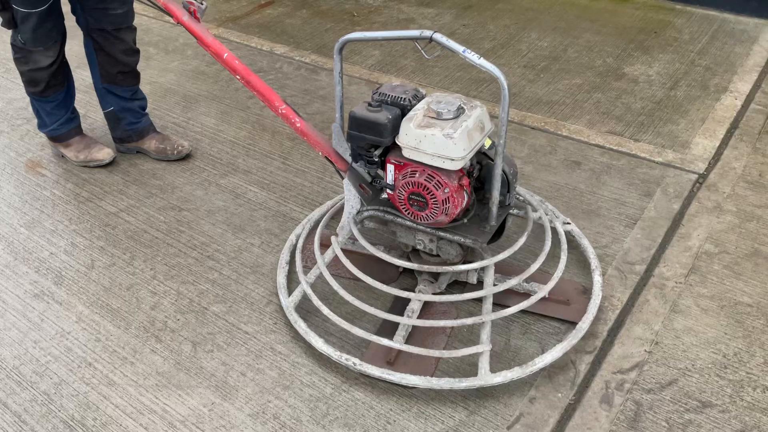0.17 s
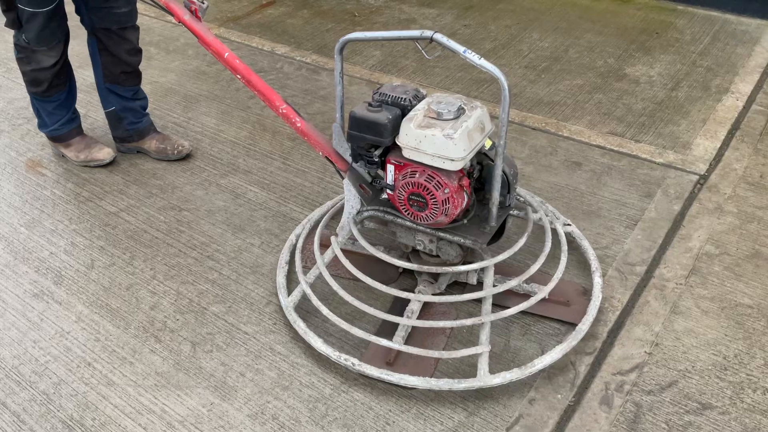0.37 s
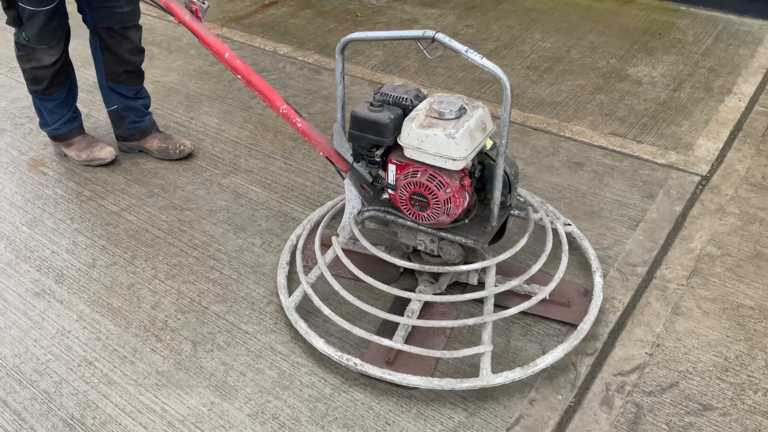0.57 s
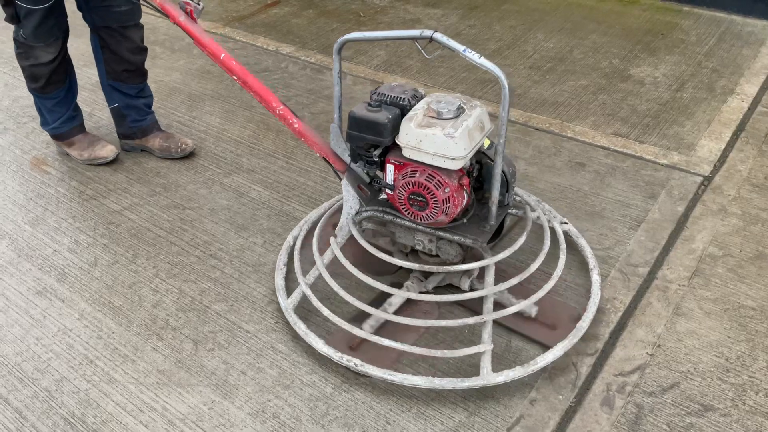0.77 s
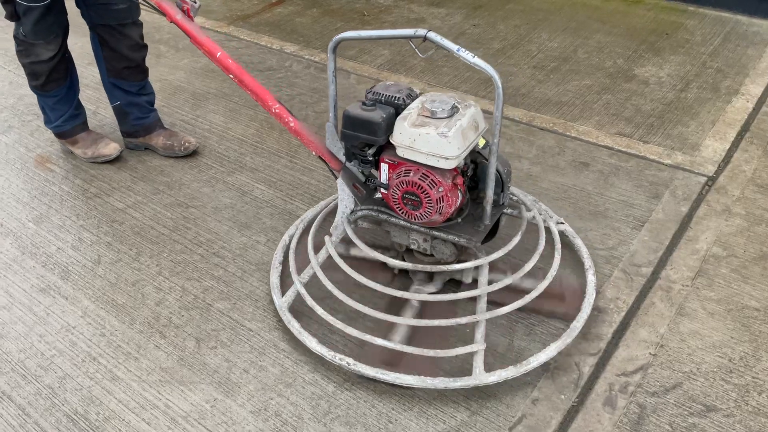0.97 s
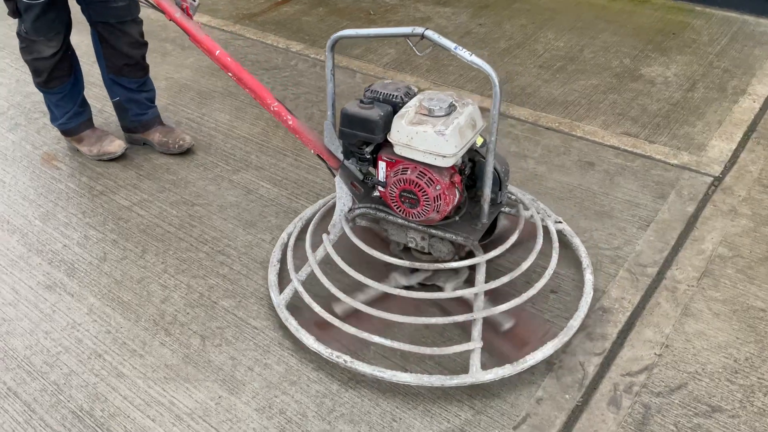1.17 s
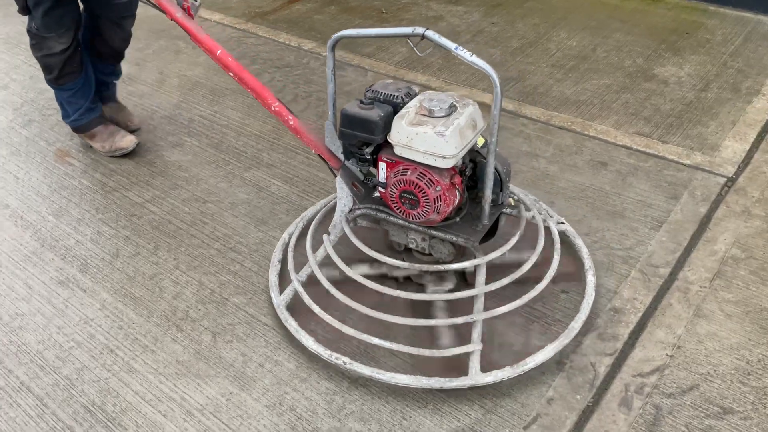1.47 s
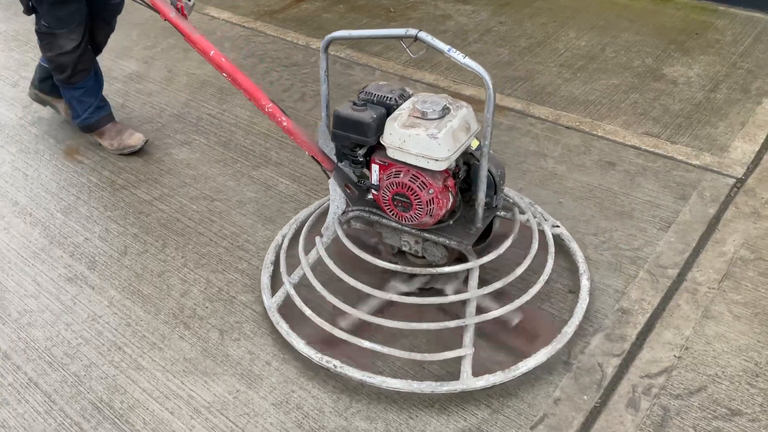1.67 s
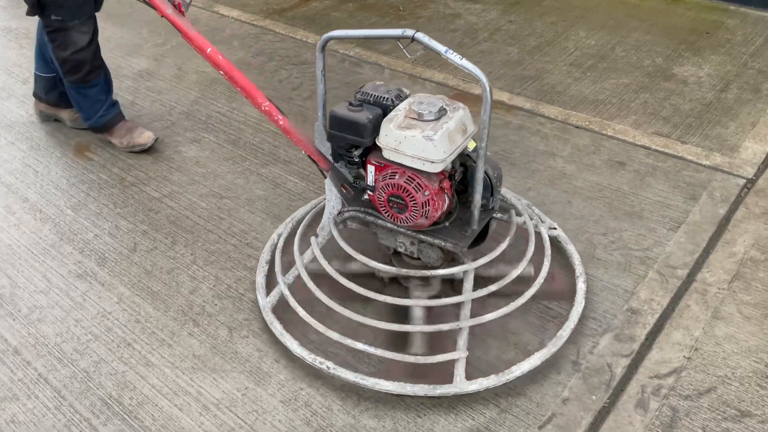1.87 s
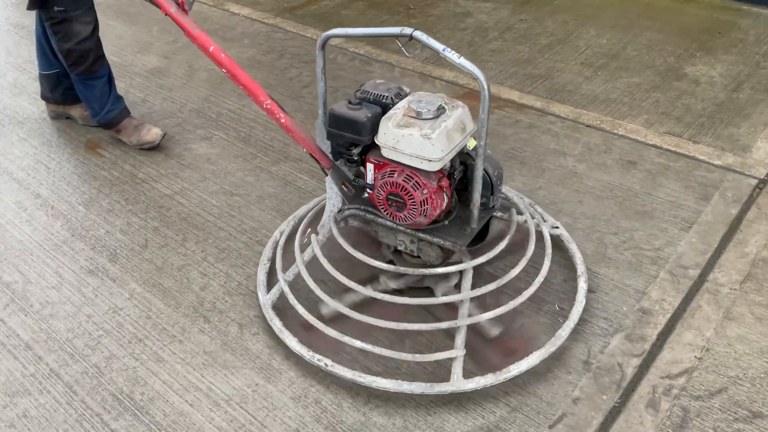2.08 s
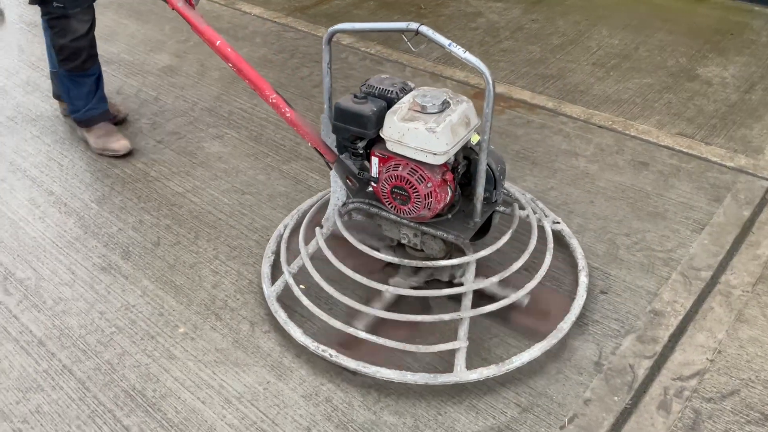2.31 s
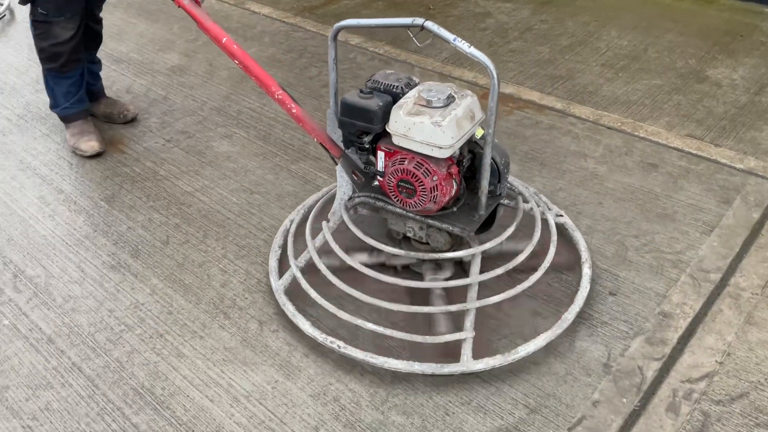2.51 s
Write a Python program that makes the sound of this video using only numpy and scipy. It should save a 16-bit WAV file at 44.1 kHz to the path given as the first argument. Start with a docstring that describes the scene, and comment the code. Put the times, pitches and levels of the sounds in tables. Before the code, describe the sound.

A small petrol engine chugs, squeaks as the drive engages, then gritty blade scraping covers it

```python
"""Petrol power trowel on concrete

A single-cylinder engine close by drones as a sum of harmonics of its firing rate, with filtered-noise clatter
and intake hiss. It sags as the drive takes up with noise-burst ticks and swept-sine squeaks; then the steel
blades turn, their gritty scrape (resonant noise with random grains) covers the engine, and the speed recovers."""
import sys
import numpy as np
from scipy import signal
from scipy.fft import rfft, irfft
from scipy.io import wavfile
from scipy.ndimage import uniform_filter1d

SR = 44100
rng = np.random.default_rng(int(sys.argv[2]) if len(sys.argv) > 2 else 0)


def store_wav(level_fs):
    """Save 16-bit WAV to argv[1]."""
    pcm = np.round(np.clip(np.atleast_2d(level_fs), -1, 1) * 32767)
    wavfile.write(sys.argv[1], SR, pcm.T.astype(np.int16))


N = 116865
T, HZ = np.arange(N) / SR, np.fft.rfftfreq(N, 1 / SR)

# engine speed: t/s, firing rate/Hz
ENGINE_SPEED = [(.04, 30.71), (.12, 30.78), (.2, 30.85), (.28, 30.3), (.36, 29.37), (.44, 28.26),
                (.52, 27.69), (.62, 28.36), (.72, 27.03), (.88, 26.2), (1.05, 25.97), (1.2, 28.43),
                (1.35, 29.9), (1.5, 29.22), (1.72, 28.49), (1.93, 29.56), (2.08, 29.35), (2.21, 27.53),
                (2.45, 30.05), (2.65, 28.98)]
# engine loudness: t/s, exhaust level/dB, clatter level/dB
ENGINE_LEVEL = [(.04, -19.5, -15), (.19, -19.5, -17), (.35, -21, -17.5), (.44, -17, -18), (.52, -13.5, -20),
                (.615, -11.5, -18), (.645, -21, -29.5), (.78, -22.5, -20.5), (.83, -26.5, -30),
                (1.07, -33, -32), (1.22, -31.5, -35), (1.38, -37, -28), (1.52, -37.5, -41), (1.9, -40, -49),
                (2.3, -40.5, -46.5), (2.65, -45.5, -41)]
# colour of the scrape, also used for the intake hiss: f/Hz, spectral density/dB per Hz
GRIT_COLOUR = [(30, -25), (150, -19), (400, -15.5), (520, -9), (780, -3), (1050, -6), (1400, -4.5),
               (1900, -4.5), (2300, -3), (3600, -4.5), (6000, -4.5), (7200, -8.5), (8500, -10.5),
               (10000, -15), (12000, -21), (16000, -27.5)]


def amp(db):
    """Decibels to gain: twenty decibels per decade of amplitude."""
    return 10 ** (np.asarray(db) / 20)


def unit(x):
    """Normalisation to an rms value of 1."""
    return x / np.sqrt(np.mean(x ** 2) + 1e-20)


def curve(table, axis=1):
    """Linear interpolation in time of one column of a table, at every sample."""
    rows = np.transpose(table)
    return np.interp(T, rows[0], rows[axis])


def read(table):
    """Interpolation of a frequency table on a logarithmic axis."""
    f, value = np.transpose(table)
    return np.interp(np.log(HZ + 1), np.log(f + 1), value)


def rings(modes):
    """Resonance: each mode (f/Hz, width/Hz, height/dB) is a bell-shaped bump in decibels."""
    return sum(db / (1 + (2 * (HZ - f) / width) ** 2) for f, width, db in modes)


def drift(hz):
    """Low-pass noise: a random wander up to the given rate, rms 1."""
    spectrum = rfft(rng.standard_normal(N))
    return unit(irfft(spectrum / (1 + (HZ / hz) ** 4), N))


def body(x, db):
    """Minimum-phase filtering: a causal ring of unit power whose spectrum has the given shape in dB."""
    cepstrum = irfft(np.log(amp(db)), N)
    # folding the cepstrum onto positive time makes the response causal
    cepstrum[1:N // 2] *= 2
    cepstrum[N // 2:] = 0
    ring = irfft(np.exp(rfft(cepstrum)), N)[:4096]
    return signal.fftconvolve(x, ring / np.linalg.norm(ring))[:N]


def add(mix, s, sound):
    """Superposition: mixes a sound in at time s, in seconds."""
    part = mix[round(s * SR):][:len(sound)]
    part += sound[:len(part)]


def exhaust(cycles):
    """Fourier synthesis: periodic gas puffs make multiples of the firing rate, recoloured by load."""
    # exhaust note: multiple of the firing rate, level running free/dB, level under load/dB
    orders = [(1, -26, -33), (2, -4, -3), (3, -7, -3.5), (4, -6, -21), (5, 4.5, 2), (6, -3, -7),
              (7, -5, -6), (8, -9, -18), (9, -1.5, -10.5), (10, -1, -10.5), (11, -24, -6.5), (12, -13, -10),
              (13, -9, -8), (14, -3, -13.5), (15, -13, -16.5), (16, -32, -12), (17, -13, -14.5),
              (18, -12, -13), (19, -16, -8), (20, -22, -11)]
    # swings of gas pressure: place in the cycle (0-1), signed strength
    puffs = [(.14, -0.47), (0.221, 0.88), (0.356, -0.52), (0.648, 0.66), (0.751, -0.16), (0.842, 0.71),
             (0.943, -0.35)]
    # strain on the engine, easing briefly as the blades get going: t/s, load (0-1)
    strain = [(.36, 0), (.48, 0.92), (.9, 0.94), (1.2, 0.12), (1.45, 1)]
    # weight of the lowest multiples, which thin out when the engine fires weakly: t/s, level/dB
    thump = [(.07, 4), (.16, 9), (.225, -16), (.27, 4), (.35, 0), (.45, -8), (.51, 0), (.85, 0.5), (1.0, 2),
             (1.08, 3), (1.16, 4), (1.5, 2)]
    thump_orders = 4
    waver_db, waver_hz, phase_scatter_rad = 0.9, 16.0, 0.25
    puff_jitter_cycles, puff_jitter_hz = .003, 60  # unevenness of the gas flow
    stroke_db = 0.9  # spread in strength from one firing to the next

    load = curve(strain)
    turns = cycles + puff_jitter_cycles * drift(puff_jitter_hz)
    note = np.zeros(N)
    for k, (_, free, loaded) in enumerate(orders, 1):
        # phase of this multiple in a train of impulses at the puff places
        timing = np.angle(sum(size * np.exp(-2j * np.pi * k * place) for place, size in puffs))
        level_db = free + (loaded - free) * load + waver_db * drift(waver_hz)
        if k <= thump_orders:
            level_db = level_db + curve(thump)
        phase = timing + phase_scatter_rad * rng.standard_normal()
        note += amp(level_db) * np.cos(2 * np.pi * k * turns + phase)

    firings = np.arange(int(cycles[-1]) + 2)
    uneven = np.interp(cycles, firings, rng.standard_normal(len(firings)))
    return unit(note) * amp(curve(ENGINE_LEVEL) + stroke_db * uneven)


def knock_gate(cycles):
    """Periodic modulation: piston and valve knocks decay exponentially over a steady bed."""
    # knocks: place in the cycle (0-1), strength
    knocks = [(0.138, 0.4), (.36, 0.29), (0.602, 0.46), (0.808, 1.0)]
    bed, knock_length_cycles = .7, .09
    gate = np.full(N, bed)
    for place, size in knocks:
        gate += size * np.exp(-((cycles - place) % 1) / knock_length_cycles)
    return gate


def clatter(cycles):
    """Impact excitation: knocks ring the crankcase, partly alike from cycle to cycle."""
    # engine clatter: f/Hz, spectral density/dB per Hz
    colour = [(20, -40), (40, -8), (65, 0), (170, -7.5), (220, -22.5), (400, -6), (680, -0.5),
              (1000, -11.5), (1200, -1.5), (1400, -8.5), (1800, -11), (2500, -13.5), (4000, -21.5),
              (6200, -24.5), (9000, -30.5), (12000, -38), (16000, -49)]
    # crankcase modes: f/Hz, width/Hz, level over the clatter/dB
    crankcase = [(720, 67, -2.5), (905, 37, 6.5), (1200, 74, -6.5), (1424, 34, 2.5), (2030, 55, 0),
                 (3190, 85, 5)]
    repeat_share = .45  # share of power that repeats each cycle

    # one cycle of noise, replayed in step with the engine
    count = round(SR / ENGINE_SPEED[0][1])
    pattern = rng.standard_normal(count)[(cycles % 1 * count).astype(int)]
    highpass = signal.butter(2, 450, "high", fs=SR, output="sos")
    alike = unit(signal.sosfilt(highpass, pattern))
    fresh = rng.standard_normal(N)
    noise = np.sqrt(repeat_share) * alike + np.sqrt(1 - repeat_share) * fresh
    ringing = body(knock_gate(cycles) * noise, read(colour) + rings(crankcase))
    return unit(ringing) * amp(curve(ENGINE_LEVEL, axis=2))


def intake_hiss(cycles):
    """Flow noise: broadband hiss with a tinny resonance, modulated in step with the knocks."""
    # intake hiss before the load comes on: t/s, level/dB
    hiss_level = [(.04, -28.5), (.18, -28), (.22, -25), (.305, -25.5), (.335, -46), (.6, -56), (.8, -75)]
    # tinny ring in the hiss: f/Hz, width/Hz, height/dB
    cover = [(3380, 48, 16), (4230, 120, 10.5)]
    noise = knock_gate(cycles) * rng.standard_normal(N)
    return unit(body(noise, read(GRIT_COLOUR) + rings(cover))) * amp(curve(hiss_level))


def scrape():
    """Friction noise: grit breaks under juddering blades and rings them; colour shifts with the contact."""
    # blades on concrete: t/s, level/dB, extra treble/dB
    contact = [(.6, -44, -17.5), (.66, -25.5, 6), (.715, -19, -2), (.755, -12, -3.5), (.82, -12, -2.5),
               (.94, -12, -2), (1.05, -13.5, 1.5), (1.11, -13.5, 0.5), (1.18, -13, 0.5), (1.27, -14, 0.5),
               (1.39, -14, 2.5), (1.55, -17.5, 2), (1.7, -18.5, 1), (1.82, -17.5, 0.5), (1.89, -16, 0),
               (1.98, -18, 2), (2.15, -17.5, 0), (2.3, -21, 2), (2.42, -20, 2), (2.47, -21.5, 4.5),
               (2.65, -20, 1)]
    # ringing of the blades: f/Hz, width/Hz, level over the scrape/dB
    blade = [(518, 44, 8), (864, 60, 4), (1156, 71, 3.5), (1525, 18, 7.5), (1673, 110, 3.5), (1902, 260, 6),
             (2800, 190, 2), (3346, 84, 5), (4020, 120, 1), (5700, 230, 0.5)]
    grains_per_s, grain_spread_db, grain_share = 6000, 0.5, 0.35  # the share is of power
    judder_db, judder_hz = 0.35, 35
    patch_db, patch_s, patch_hz = 2, 0.027, 220
    treble_hz = 2800  # half the extra treble in dB is reached here

    strength = amp(grain_spread_db * np.minimum(rng.exponential(1, N), 4))
    struck = rng.random(N) < grains_per_s / SR
    grains = rng.standard_normal(N) * strength * struck
    steady = rng.standard_normal(N)
    drive = np.sqrt(grain_share) * unit(grains) + np.sqrt(1 - grain_share) * steady
    drive *= amp(judder_db * drift(judder_hz))

    # random patches of gain in time and frequency
    hz, t, z = signal.stft(drive, SR, nperseg=512, noverlap=384)
    patches = uniform_filter1d(rng.standard_normal(z.shape), max(1, round(patch_hz / hz[1])), 0)
    patches = unit(uniform_filter1d(patches, max(1, round(patch_s / t[1])), 1))
    treble_shelf = hz ** 2 / (hz ** 2 + treble_hz ** 2)
    treble_db = np.outer(treble_shelf, np.interp(t, T, curve(contact, axis=2)))
    coloured = z * amp(patch_db * patches + treble_db)
    drive = signal.istft(coloured, nperseg=512, noverlap=384)[1][:N]
    return unit(body(drive, read(GRIT_COLOUR) + rings(blade))) * amp(curve(contact))


def drive_ticks():
    """Transient excitation: the drive snatches about twice per firing, each tick a short noise burst."""
    # ticks: t/s, level/dB
    ticks = [(.444, -28), (0.481, -18), (0.496, -23.5), (.518, -16.5), (0.5343, -21), (0.553, -16),
             (0.57, -19), (0.59, -13.5), (0.605, -17), (.625, -16.5), (.654, -10)]
    # colour of a tick: f/Hz, spectral density/dB per Hz
    tick_colour = [(200, -39), (1500, -5), (3000, -3), (6200, -3.5), (9000, -11.5), (12000, -16.5),
                   (16000, -28)]
    rise_s, fall_s = .0013, .006
    t = T[:SR // 20]
    shape = np.minimum(t / rise_s, 1) * np.exp(-np.maximum(t - rise_s, 0) / fall_s)
    bursts = np.zeros(N)
    for s, db in ticks:
        add(bursts, s, amp(db) * shape * rng.standard_normal(len(t)))
    return body(bursts, read(tick_colour))


def belt_squeaks():
    """Frequency modulation: each belt squeak is a short sine with sagging, roughened pitch."""
    # squeaks: t/s, length/s, f/Hz, level/dB
    squeaks = [(.626, .009, 2850, -8.5), (0.636, 0.0099, 2607, -14), (0.64, 0.013, 3800, -21.5),
               (0.6345, 0.008, 5070, -24), (0.643, 0.0075, 1880, -23), (0.674, 0.026, 2794, -17.5)]
    sag, rough, rough_hz = 0.041, 0.06, 570  # sag and roughness as fractions of the pitch
    mix = np.zeros(N)
    for s, length, hz, db in squeaks:
        u = T[T < length] / length
        pitch = hz * (1 + sag * (.5 - u) + rough * drift(rough_hz)[:len(u)])
        envelope = np.sqrt(abs(np.sin(np.pi * u)))
        tone = envelope * np.sin(2 * np.pi * np.cumsum(pitch) / SR)
        add(mix, s, amp(db) * unit(tone))
    return mix


def microphones(x):
    """Interchannel phase and level differences: two ports hear the machine, plus scatter from the yard."""
    # phase by which left leads: f/Hz, phase/rad
    lead = [(0, 0), (60, -.04), (160, -.15), (420, -.3), (650, -.1), (880, -.8), (1130, .5), (1400, .1),
            (1900, -1.6), (2550, -3.14), (3000, -3.9), (3350, -5), (3520, -6.283), (6250, -6.283),
            (6700, -5.1), (7450, -5.1), (7650, -6.283)]
    # left minus right: f/Hz, level/dB
    balance = [(50, 0.5), (150, 1.5), (280, 1), (520, 0.5), (720, 10), (1000, -2.5), (1400, 7), (1650, 7),
               (1900, 3), (2200, 4.5), (3300, 1), (4300, 0), (5300, -4), (6200, -5.5), (7400, 1)]
    # scattered sound: f/Hz, power relative to direct sound
    diffuse = [(100, .004), (350, 0.053), (700, 0.1), (1400, 0.29), (2500, 0.074), (4000, 0.012),
               (6500, 0.026)]
    stereo = HZ < 7600  # no level difference or scatter above this frequency

    t = T[:SR // 8]
    tail = rng.standard_normal(len(t)) * amp(-60 * t / 0.08)  # falls 60 dB in 0.08 s
    scattered = signal.fftconvolve(x, tail / np.linalg.norm(tail))[:N]
    scatter = rfft(scattered) * np.sqrt(read(diffuse)) * stereo
    direct = rfft(x)
    ratio = amp(read(balance) * stereo)
    left = direct * ratio + scatter
    right = (direct - scatter) * np.exp(-1j * read(lead))
    # keeps the summed power of the direct sound independent of the balance
    return irfft(np.array([left, right]) * np.sqrt(2 / (1 + ratio ** 2)), N)


def scene():
    """Superposition of engine, blades and drive at one spot in the yard."""
    cycles = np.cumsum(curve(ENGINE_SPEED)) / SR  # one cycle per firing
    engine = exhaust(cycles) + clatter(cycles) + intake_hiss(cycles)
    return microphones(engine + scrape() + drive_ticks() + belt_squeaks())


def record(dry):
    """Gating, saturation and band limiting: the input opens, rounds off high peaks, then cuts the top."""
    start_s, closed_db, edge_hz = .035, -67, 16100
    opened = dry * np.clip((T - start_s) / .002, amp(closed_db), 1)  # 2 ms ramp
    rounded = opened / (1 + (abs(opened) / .92) ** 8) ** (1 / 8)
    lowpass = signal.firwin(511, edge_hz, window=("kaiser", 9), fs=SR)
    return signal.oaconvolve(rounded, lowpass[None], "same")


dry = scene()
out = record(dry)
store_wav(out)
```